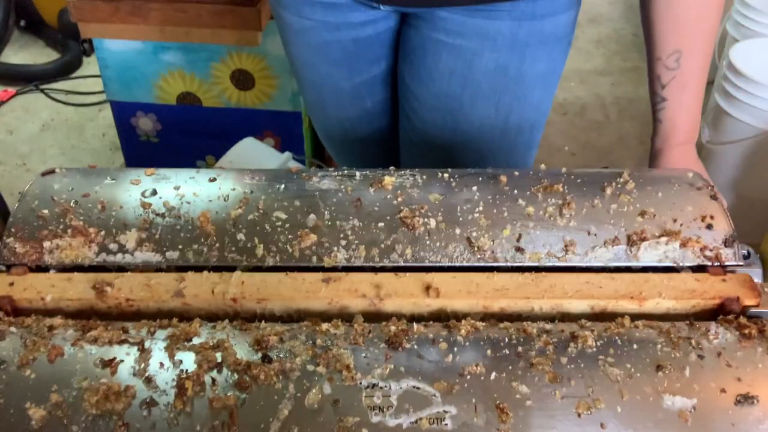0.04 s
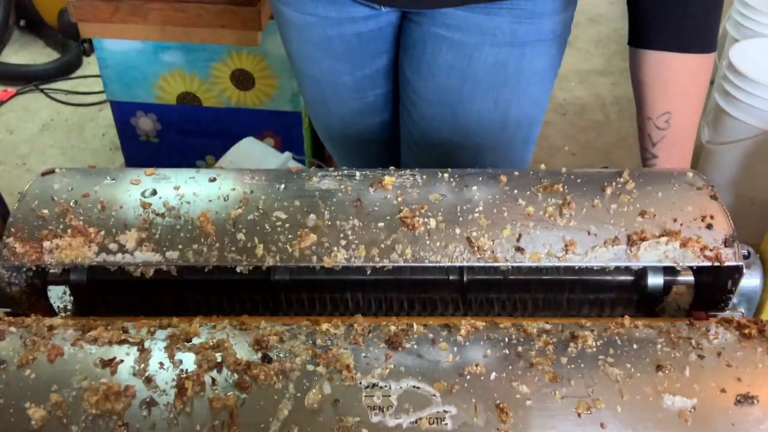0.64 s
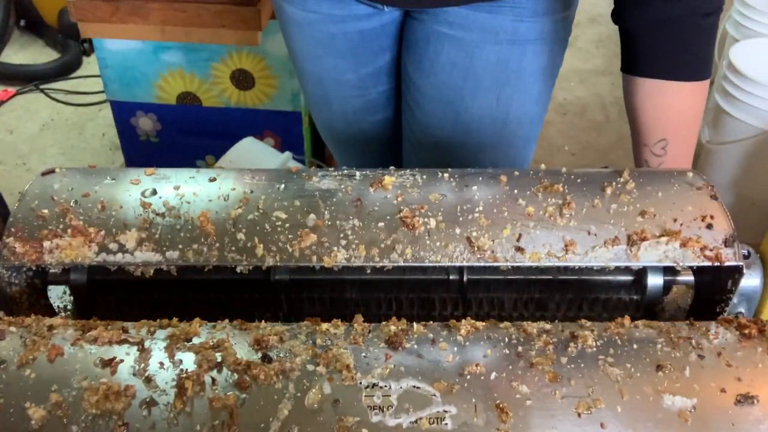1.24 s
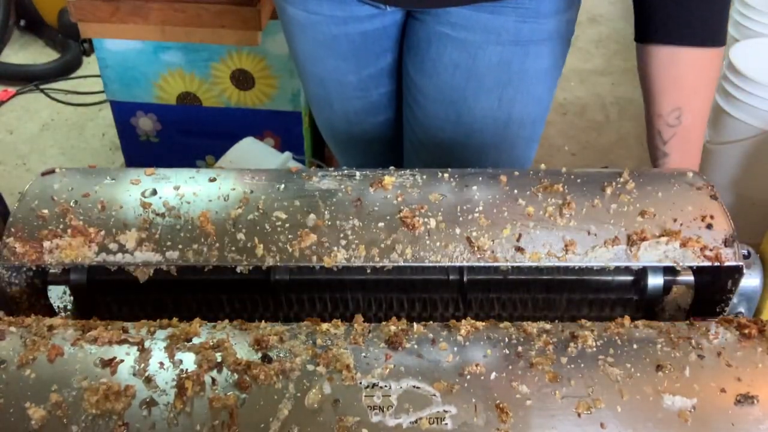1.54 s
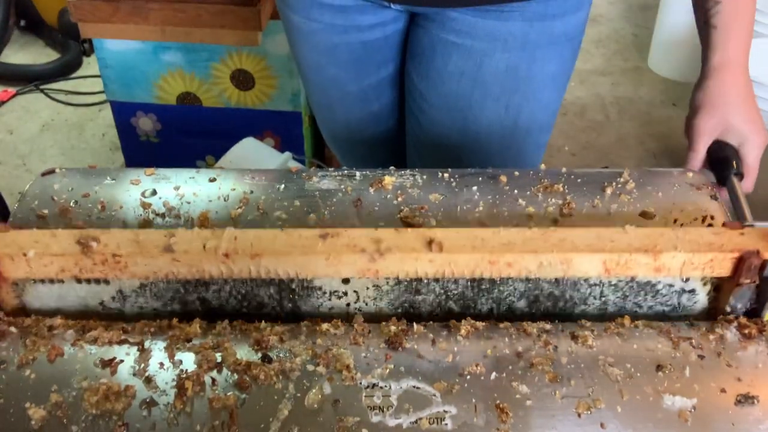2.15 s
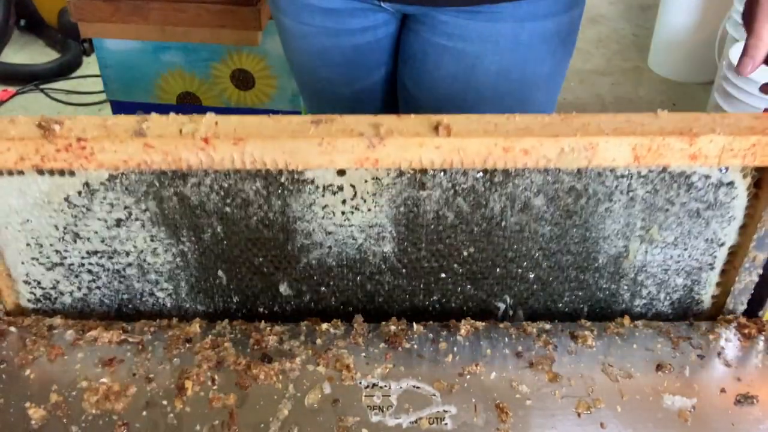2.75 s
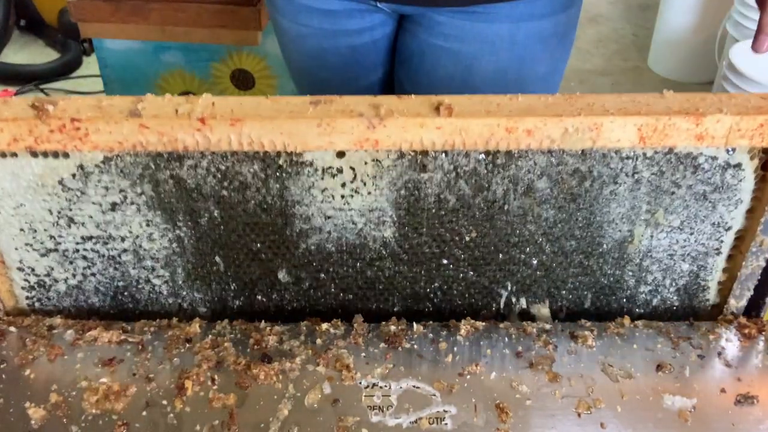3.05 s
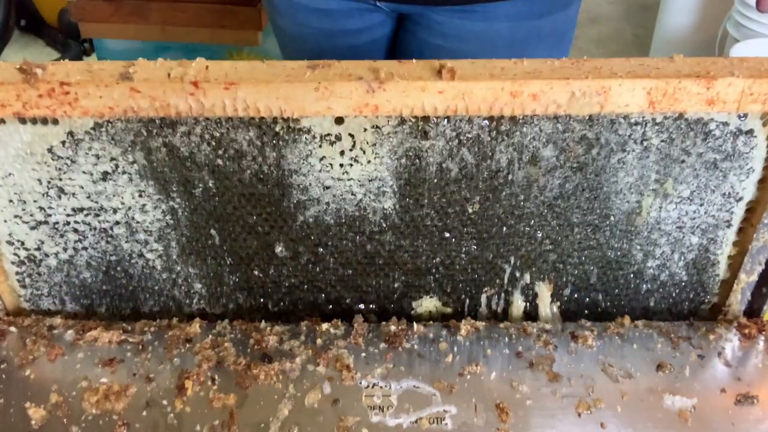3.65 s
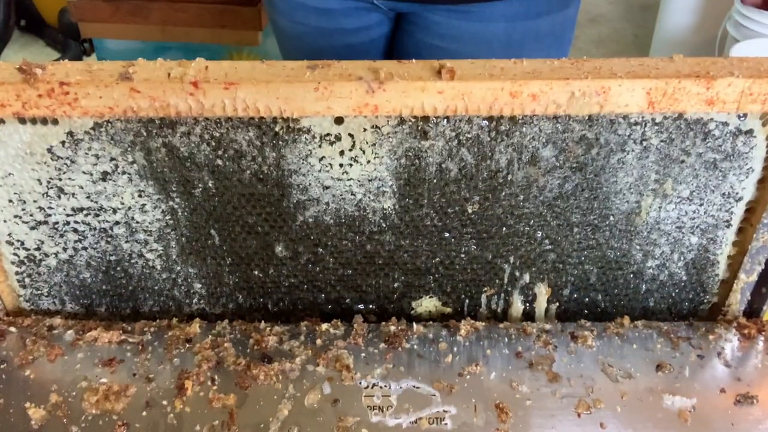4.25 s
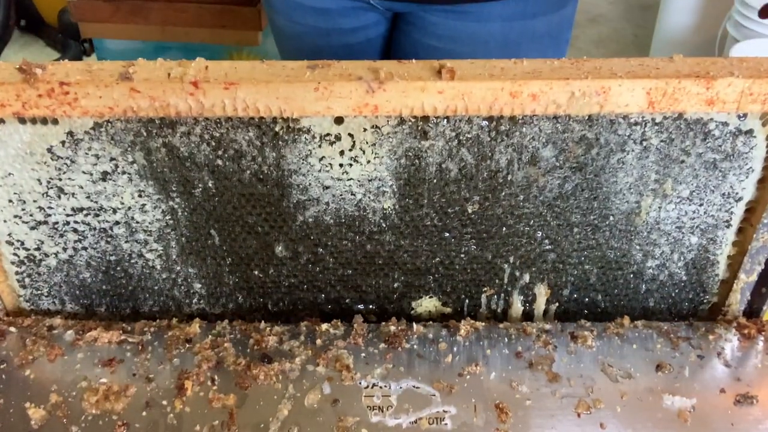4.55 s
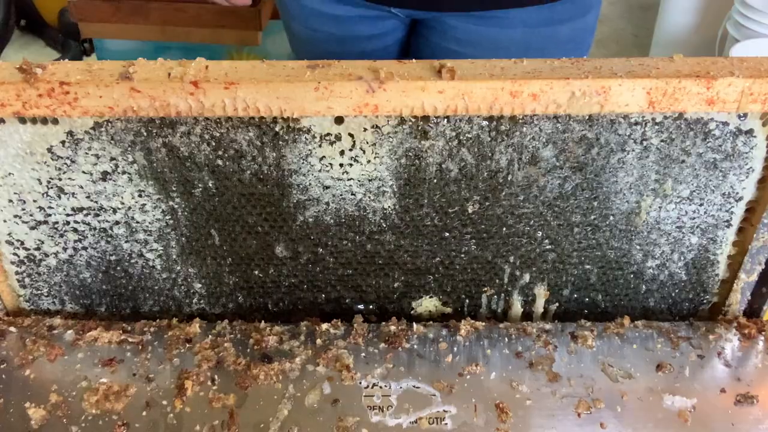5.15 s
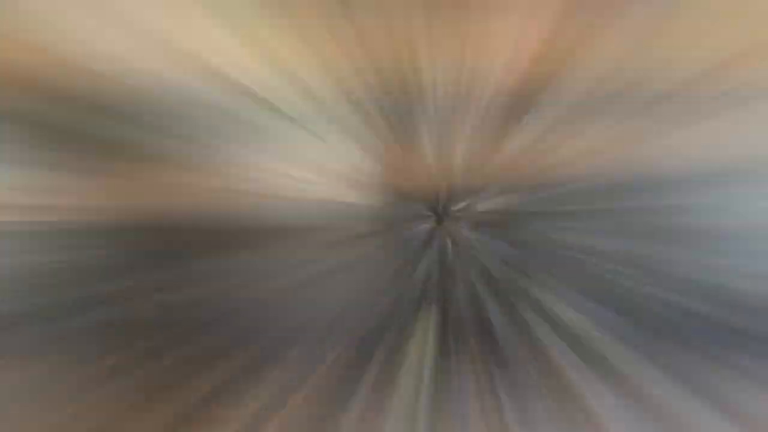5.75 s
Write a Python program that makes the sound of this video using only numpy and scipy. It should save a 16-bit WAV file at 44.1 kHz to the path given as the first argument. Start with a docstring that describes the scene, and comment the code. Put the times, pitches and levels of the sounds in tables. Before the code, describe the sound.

Spinning flails whir and rumble in a steel shell, flicking crumbs of wax, heard from close up indoors. The sound swells into a rough, buzzing grind as they strip a honey frame, then eases. A loud knock comes as the power stops, and a fast run of sharp ticks slows and dies away. Another knock and a soft, sticky crackle of wax leave only the quiet hum of the room.

```python
"""Uncapping a honey frame

Four rows of motor-driven flails whirl in a steel housing, bite into the comb and fling wax.
The motor cuts out, the cradle clacks against its stop and the flails tick ever slower on the frame.
Sticky wax drags and snaps over the hum of the workroom."""
import sys
import numpy as np
from scipy import signal
from scipy.fft import rfft, irfft
from scipy.io import wavfile

SR = 44100
rng = np.random.default_rng(int(sys.argv[2]) if len(sys.argv) > 2 else 0)


def transcribe(signal):
    """Save signal, clipped to [-1, 1], as a 16-bit WAV file at the path in sys.argv[1]."""
    frames = np.atleast_2d(signal).T
    limited = np.clip(frames, -1, 1)
    pcm = np.round(limited * 32767).astype(np.int16)
    wavfile.write(sys.argv[1], SR, pcm)


N = 260631
T = np.arange(N) / SR
POWER_OFF_S, REST_S = 3.35, 4.55


def amp(db):
    """Decibels to gain."""
    return 10 ** (np.asarray(db) / 20)


def pan(left_db, right_db):
    """A gain for each channel."""
    return amp([[left_db], [right_db]])


def curve(rows, column=1):
    """One column of a table, joined by straight lines in time."""
    rows = np.array(rows)
    return np.interp(T, rows[:, 0], rows[:, column])


def since(s):
    """Seconds after s, zero before."""
    return np.maximum(T - s, 0)


def swell(s, half_s):
    """A smooth rise and fall around time s."""
    return np.exp(-((T - s) / half_s) ** 2)


def fade(t60_s, size=SR // 2):
    """Exponential decay."""
    return np.exp(-np.log(1000) * np.arange(size) / SR / t60_s)


def walk(rate_hz):
    """Smooth random wander with a spread near 1."""
    return 1.2 * np.interp(T * rate_hz, np.arange(1024), rng.standard_normal(1024))


def unit(x):
    """Scale so that the mean of the channels has rms 1."""
    return x / np.sqrt(np.mean(np.atleast_2d(x).mean(axis=0) ** 2))


def unit_peak(x):
    """Scale to a peak of 1."""
    return x / np.abs(x).max()


def add(out, s, x):
    """Mix a short stereo sound in at time s."""
    i = max(int(s * SR), 0)
    out[:, i:i + x.shape[1]] += x[:, :max(N - i, 0)]


def butter(x, hz, kind="low", order=2):
    """Butterworth filter."""
    return signal.sosfilt(signal.butter(order, hz, kind, fs=SR, output="sos"), x)


def convolve(x, impulse):
    """Convolve in time, keeping the length of x."""
    return signal.oaconvolve(x, impulse, axes=1)[:, :x.shape[1]]


def colour(x, spectrum, modes=(), size=8192):
    """Minimum-phase filter from a spectrum (Hz, dB) and resonances (Hz, width in Hz, lift in dB)."""
    f = np.arange(size // 2 + 1) * SR / size + 1
    hz, db = np.transpose(spectrum)
    humps_db = sum(lift / (1 + (2 * (f - centre) / width) ** 2) for centre, width, lift in modes)
    gain = amp(np.interp(np.log(f), np.log(hz), db) + humps_db)
    cepstrum = irfft(np.log(gain))[:size // 2]
    cepstrum[0] /= 2
    impulse = irfft(np.exp(rfft(2 * cepstrum, size)))[:size // 2]
    return convolve(x, impulse[None])


def diffuse(size=N, split_hz=560):
    """Noise from all round: alike in both channels in the bass, unrelated above."""
    mid, side = rng.standard_normal((2, size))
    bass = butter(np.roll(side, size // 2), split_hz, order=1)
    side = butter(side, split_hz, "high") + .047 * bass
    return np.array([mid + side, mid - side])


def narrow(hz, width_hz):
    """A noisy resonance whose centre may move."""
    drift = butter(rng.standard_normal(N) + 1j * rng.standard_normal(N), width_hz / 2)
    carrier = np.exp(2j * np.pi * np.cumsum(hz * np.ones(N)) / SR)
    return unit(np.real(drift * carrier))


def crackle(grain_db):
    """Dense tiny grains of unequal size."""
    return unit(rng.standard_normal(N) * amp(grain_db * np.minimum(rng.exponential(size=N), 6)))


def from_right(x, lag_s=.000263):
    """A sound from the right reaches the left channel a little later."""
    delay = np.sinc(np.arange(24) - lag_s * SR) * np.hanning(24)
    return np.array([np.convolve(x, delay)[:len(x)], x])


def engaged():
    """Share of the comb that lies between the flails as the frame is raised."""
    return np.interp(T, [1.4, 1.75, 2.6, 3.4], [0, 1, 1, 0])


def moving(settle_s=.12):
    """1 while the flails swing, 0 once they have settled."""
    return np.clip(1 - since(REST_S) / settle_s, 0, 1)


# Force in dB of each flail row in one turn.
ROW_FORCE_DB = [3.5, 1, 1.5, -0.5]
def strikes(phase, decay, scatter_db, floor):
    """An uneven pulse at each flail row; phase and decay are counted in strikes."""
    count = phase.astype(int)
    row_db = np.array(ROW_FORCE_DB)[count % len(ROW_FORCE_DB)]
    force = amp(row_db + scatter_db * rng.uniform(-1, 1, 512)[count])
    return unit(floor + force * np.exp(-(phase % 1) / decay))


# Each row: frequency in Hz, level in dB.
ROOM_SPECTRUM = [(20, -27.5), (50, -10), (95, -8.5), (165, -7.5), (330, -4), (450, -11.5), (700, -20.5),
                 (1500, -23.5), (2600, -33), (6000, -40.5), (16000, -54)]
ROOM_HUM = [(97.5, -7), (154, -9), (191, -1.5), (288.5, -2.5), (407, -5.5), (554, -20.5)]
def room():
    """The workroom murmurs and hums; both sink after the machine has stopped."""
    hum = sum(amp(db + walk(8)) * narrow(hz, width_hz=8) for hz, db in ROOM_HUM)
    hum = hum * amp(-62.5 - since(REST_S))
    murmur = unit(colour(diffuse(), ROOM_SPECTRUM)) * amp(-63.5)
    lift_db = np.maximum(7 - 6.5 * since(REST_S), 0)
    return (murmur + hum) * amp(lift_db)


# Each row: frequency at full speed in Hz, level in dB.
MOTOR_HUM = [(119.8, -41.5), (269, -41.5), (592, -56.5)]
# Each row: time in seconds, level of the tone in dB, level of its octave in dB.
MOTOR_WHINE = [(0, -51, -70), (.3, -52.5, -59.5), (.6, -59, -61.5), (.95, -53, -57), (1.4, -55.5, -57.5),
               (1.7, -60, -68), (2.4, -64.5, -72), (3.3, -50, -78)]
def motor(speed, whine_hz=1321, flutter_hz=45, stop_s=.082):
    """Mains hum and a whine that flutters in the flails' draught sink and die at the power cut."""
    run_time = np.cumsum(np.where(T < POWER_OFF_S, 1, speed) * (1 + .0013 * walk(16))) / SR

    def tone(hz, db, wobble=0):
        return amp(db) * np.sqrt(2) * np.sin(2 * np.pi * hz * run_time + wobble)

    hum = sum(tone(hz, db + 2.3 * walk(7.9) + 1.5 * walk(35)) for hz, db in MOTOR_HUM)
    whine = 0
    for k in (1, 2):
        whistle = tone(k * whine_hz, db=2.6 * walk(flutter_hz), wobble=.5 * walk(flutter_hz))
        air = amp(-3) * narrow(k * whine_hz, width_hz=70)
        whine += (whistle + air) * amp(curve(MOTOR_WHINE, k))
    return (hum + whine * pan(-6, 1)) * np.exp(-since(POWER_OFF_S) / stop_s)


# Each row: frequency in Hz, level in dB.
WHISK_SPECTRUM = [(500, -12.5), (1400, 5.5), (2300, -5), (3000, -4), (4500, -2.5), (5700, 4), (7000, -0.5),
                  (10000, -24.5)]
def whisk(phase, speed):
    """The flails whisk the air into a hiss that dies quickly with their speed."""
    hiss = unit(colour(diffuse(), WHISK_SPECTRUM))
    return hiss * strikes(phase, decay=.52, scatter_db=1.8, floor=.99) * amp(-53.5) * speed ** 2


# Each row: frequency in Hz, level in dB.
RUMBLE_SPECTRUM = [(20, -44.5), (45, -12.5), (80, -8), (115, 2.5), (170, -6), (290, -8.5), (400, -21),
                   (600, -15), (1200, -44.5), (4000, -67)]
# Each row: frequency in Hz, width in Hz, lift in dB.
HOUSING_MODES = [(92.3, 6.1, -5), (115.6, 7.5, -1.5), (204.5, 33, 8.5), (262.9, 8, 11), (354.7, 70, 10),
                 (373, 85, 2), (594, 110, -1.5), (763, 4.2, 10), (1103, 34, -8), (1260, 140, 12)]
# Each row: time in seconds, level in dB.
SHAKE_LEVEL = [(0, -24.5), (.3, -29), (1.3, -30.5), (1.65, -26), (2.55, -21), (2.95, -26), (3.33, -26)]
def housing(phase, speed, unpowered_db=-9.5):
    """The flails shake the steel shell, less and in more distinct pulses once they coast."""
    shaking = diffuse() * strikes(phase, decay=.4, scatter_db=3, floor=.5 * speed)
    rumble = unit(colour(shaking, RUMBLE_SPECTRUM, HOUSING_MODES))
    unpowered = 1 - np.exp(-since(POWER_OFF_S) / .044)
    level_db = curve(SHAKE_LEVEL) - 1.5 + unpowered_db * unpowered + walk(12)
    return rumble * amp(level_db) * speed ** .56 * moving()


# Each row: frequency in Hz, level in dB.
CRUMB_SPECTRUM = [(500, -14.5), (1000, 3.5), (1700, 5.5), (2400, -4.5), (3600, 1), (4200, 0), (5000, -8.5),
                  (5800, 2), (7000, -4), (10000, -18.5)]
# Resonances of hood and flails. Each row: frequency in Hz, width in Hz, lift in dB.
HOOD_MODES = [(390.4, 21, 13), (525, 33, 7.5), (587, 12, 4.5), (738.8, 21, 11.5), (789, 13, 7),
              (1400, 320, 1.5), (1990, 54, 6.5), (2130, 80, 7), (2480, 150, 4.5), (2844, 84, 6.5),
              (4116, 130, 5)]
def crumbs(phase, scatter_db=4.5, fall_db_per_s=6):
    """Wet crumbs leave with each flail row and patter on the hood, ever fainter."""
    chance = strikes(phase, decay=.35, scatter_db=4, floor=.2) * 260 / SR
    taps = (rng.random((3, N)) < chance) * rng.choice([-1, 1], (3, N))
    taps = taps * amp(scatter_db * np.clip(rng.standard_normal((3, N)), -2, 2))
    patter = convolve(taps[:2] + from_right(taps[2]), diffuse(SR // 2) * fade(.014))
    return unit(colour(patter, CRUMB_SPECTRUM, HOOD_MODES)) * amp(-48.5 - fall_db_per_s * T) * moving()


# Each row: frequency in Hz, level in dB.
WAX_SPECTRUM = [(1500, -17.5), (4000, -6.5), (6500, -0.5), (8500, 5.5), (12000, 5.5), (15500, 5),
                (17000, -27)]
# Each row: time in seconds, level in dB.
MIST_LEVEL = [(0, -46.5), (1.6, -45.5), (1.83, -36), (2.3, -34), (2.46, -41.5), (2.8, -40), (2.92, -48.5),
              (3.3, -49.5)]
WAX_CLUMPS = [(.045, -38), (.095, -39.5), (.205, -36), (.38, -39), (.422, -37), (.492, -35.5),
              (.607, -39.5), (.662, -40.5), (.718, -40), (.825, -34.5), (.885, -37.5), (1.359, -36.5),
              (2.335, -49), (2.395, -32), (2.82, -39)]
def spray(phase, speed, clump_rise_s=.01, clump_t60_s=.24):
    """Strikes fling wax on the steel: a light load as mist, a heavy one in distinct puffs."""
    flung = amp(curve(MIST_LEVEL)) * speed ** 1.5 * moving()
    for s, db in WAX_CLUMPS:
        rise = np.clip(1 + (T - s) / clump_rise_s, 0, 1)
        flung = np.hypot(flung, rise * amp(db - 60 * since(s) / clump_t60_s))
    lumpiness = np.interp(flung, amp([-46, -37]), [.45, 1])
    puffs = 1 + lumpiness * (strikes(phase, decay=.35, scatter_db=5.5, floor=.28) - 1)
    flecks = from_right(crackle(grain_db=.99) * puffs) + .086 * diffuse() * puffs
    return unit(colour(flecks, WAX_SPECTRUM)) * flung


# Each row: frequency in Hz, level in dB.
DRAG_SPECTRUM = [(200, 13), (700, 3), (1500, 3.5), (2500, -1.5), (5000, -2.5), (8000, -2.5), (16000, -0.5)]
# Each row: time in seconds, level in dB.
DRAG_LEVEL = [(4.47, -64), (4.5, -61), (4.53, -56), (4.56, -50), (4.6, -54), (4.625, -44), (4.675, -51.5),
              (4.695, -49), (4.73, -50), (4.77, -67), (4.9, -70), (5.05, -83), (5.5, -100)]
WAX_SNAPS = [(.094, -29), (.194, -25), (.492, -28), (.663, -30), (.719, -25.5), (1.796, -20), (1.853, -20),
             (1.881, -17), (1.909, -21.5), (2.083, -18.5), (2.285, -18), (2.401, -23), (3.115, -26.5),
             (3.225, -32), (3.343, -6.5), (4.109, -27), (4.117, -16.5), (4.48, -39.5), (4.694, -26.5),
             (4.718, -35), (4.728, -35.5), (4.807, -52), (4.856, -51), (4.8728, -44.5), (4.96, -55.5),
             (5.188, -49.5), (5.523, -57), (5.587, -51.5)]
def sticky_wax(size=SR // 4):
    """Honeyed wax drags in the cradle, parts in bright snaps and squeaks once off the steel."""
    smear = unit(colour(from_right(crackle(grain_db=3)) + 1.6 * diffuse(), DRAG_SPECTRUM))
    out = smear * amp(curve(DRAG_LEVEL) + 2 * walk(160))
    # a strand tears for a moment before it parts
    strain = np.clip(np.arange(size) / SR / .005, 0, 1) ** 2
    release = np.roll(fade(.011, size), int(.003 * SR)) + .28 * fade(.13, size)
    for s, db in WAX_SNAPS:
        snap = colour(from_right(rng.standard_normal(size) * strain * release), WAX_SPECTRUM)
        add(out, s - .0018, amp(db + 2.5) * unit_peak(snap))
    squeak = narrow(11200, width_hz=700) * amp(-68) * swell(5.21, half_s=.025)
    return out + squeak


def shudder():
    """The wooden frame booms against the cradle as the comb first meets the flails."""
    return narrow(114.2, width_hz=9.3) * amp(-27.5) * swell(1.69, half_s=.21)


# Each row: time in seconds, lower and upper resonance in Hz, upper over lower in dB, cavity in Hz.
SLOT_TUNING = [(1.5, 964, 1280, -5, 319), (1.9, 980, 1250, 10, 345), (2.2, 1027, 1231, -2, 383),
               (2.4, 1099, 1247, -5.5, 409), (2.75, 1150, 1266, -1, 455.6)]
def slot(phase, load_db):
    """Air between frame and hood sings over a cavity, both retuned as the frame slides through."""
    balance = amp(curve(SLOT_TUNING, 3) / 2)
    lower = narrow(curve(SLOT_TUNING, 1), width_hz=85) / balance
    upper = narrow(curve(SLOT_TUNING, 2), width_hz=85) * balance
    cavity = narrow(curve(SLOT_TUNING, 4), width_hz=55) * amp(-4)
    pulses = strikes(phase, decay=.35, scatter_db=2.5, floor=.45)
    return (lower + upper + cavity) * pulses * engaged() * amp(load_db - 33) * pan(-1.5, .5)


# Each row: time in seconds, centre in Hz, width in Hz, level in dB, half length in seconds.
HOOD_SCRAPES = [(.86, 600, 300, -42, 0.044), (0.98, 1158, 900, -44, 0.026), (1.684, 540, 130, -29, .018),
                (1.62, 1140, 160, -41, 0.11), (1.973, 1250, 120, -29, 0.022), (2.17, 1980, 120, -39, 0.056),
                (2.24, 1235, 150, -28, 0.055), (2.38, 2840, 180, -35, .03), (2.62, 600, 250, -34, 0.044),
                (2.69, 2700, 520, -40, .08), (3.421, 2000, 400, -35, 0.038), (4.49, 2900, 450, -57, 0.013)]
def scrapes(phase):
    """Torn cappings scrape along the hood, pulsed by the flails."""
    rasp = sum(narrow(hz, width) * amp(db) * swell(s, half) for s, hz, width, db, half in HOOD_SCRAPES)
    return rasp * strikes(phase, decay=.35, scatter_db=3, floor=.3) * pan(-1, 1)


# Each row: start in seconds, peak in dB.
CHUNK_RIPS = [(1.9226, -26), (1.937, -21), (2.054, -15.5), (2.167, -16.5), (2.1942, -18), (2.283, -22),
              (2.3698, -18.5), (2.3845, -18), (2.709, -23), (2.74, -23)]
# Each row: frequency in Hz, level in dB.
RIP_SPECTRUM = [(400, -26), (1200, -5), (2100, -1.5), (3000, 0), (4400, 2.5), (6000, -5), (9000, -10),
                (16000, -32)]
def rips(size=SR // 8):
    """A flail rips whole chunks from the comb, each with its own pitch of crunch."""
    out = np.zeros((2, N))
    envelope = fade(.048, size) * (1 - fade(.0053, size))
    for s, db in CHUNK_RIPS:
        crunch = [(rng.uniform(1800, 5000), 700, 6)]
        tear = colour(diffuse(size) * envelope, RIP_SPECTRUM, crunch)
        add(out, s, amp(db) * unit_peak(tear))
    return out


# Each row: frequency in Hz, level in dB, t60 in seconds.
MACHINE_RING = [(196, -11.5, 0.17), (292.4, -7.5, 0.08), (444, -12.5, .05), (495, -1, .11),
                (553, -14, 0.025), (810, -14.5, 0.049), (1136, -2.5, 0.09), (1305, -5, 0.07),
                (1348, 1, 0.063), (1724, -6.5, .1)]
FLAIL_RING = [(2680, -8, 0.17), (2970, -6.5, .1), (3338, -2.5, .12), (3550, -2, 0.12), (3650, -1, .1),
              (3830, -1, 0.079), (3970, -2, .13), (4240, -1.5, 0.14), (4500, -0.5, .11), (4780, -13, .1)]
def ring(modes, low_db=0, size=SR // 2, scatter_db=4, detune=.009):
    """Struck steel rings a little differently at every blow; low_db lifts the low modes."""
    t = np.arange(size) / SR
    out = 0
    for hz, db, t60_s in modes:
        force, shift, side = rng.uniform(-1.02, 1, 3)
        spread = np.array([[1], [-1]]) * side * min(hz / 3000, 1)
        angle = 2 * np.pi * hz * (1 + detune * shift) * t + np.pi * shift + spread
        gain = amp(db + scatter_db * force + low_db * (hz < 650))
        out += gain * np.sin(angle) * fade(t60_s, size)
    return out * pan(-1, 1)


# Each row: start in seconds, crack in dB, thud in dB, t60 in seconds, thud cutoff in Hz.
CRADLE_KNOCKS = [(3.3438, -21, -17, 0.37, 1500), (4.114, -36.5, -27.5, 0.29, 500),
                 (4.483, -59, -58, 0.1, 1510), (5.2, -92, -45.5, 0.25, 351), (5.524, -72.5, -74, .08, 1500),
                 (5.856, -82, -46.5, 0.12, 1500)]
# Each row: frequency in Hz, level in dB.
CRACK_SPECTRUM = [(300, -15.5), (750, 8), (1400, 7), (2200, 5), (3600, 1), (5000, 1), (8000, 2),
                  (16000, -30)]
THUD_SPECTRUM = [(40, -23.5), (90, -1.5), (190, -2.5), (340, -9.5), (600, -5), (1200, -11.5), (2000, -30.5),
                 (6000, -49.5)]
# Each row: frequency in Hz, width in Hz, lift in dB.
CRADLE_MODES = [(500, 70, 8), (790, 90, 8), (1135, 70, 6), (1320, 110, 5), (3000, 130, 8), (4030, 220, 7),
                (5850, 200, 4), (7750, 700, 4), (8800, 400, 4)]
def knocks(size=SR // 2):
    """The cradle strikes the shell: a rattling crack over a dull thud."""
    out = np.zeros((2, N))
    attack = 1 - fade(.003)
    for s, crack_db, thud_db, t60_s, cutoff_hz in CRADLE_KNOCKS:
        crack = unit(colour(diffuse(size), CRACK_SPECTRUM, CRADLE_MODES))
        crack *= 1.1 * fade(t60_s) + 2.1 * fade(.071)
        thud = unit(colour(diffuse(size), THUD_SPECTRUM, HOUSING_MODES)) * fade(t60_s)
        boom = colour(amp(1) * ring(MACHINE_RING), THUD_SPECTRUM)  # soft contact favours low modes
        dull = butter(thud + boom, cutoff_hz)
        add(out, s, (amp(crack_db) * crack + amp(thud_db) * dull) * attack)
    return out


# Each row: multiple of the strike rate, level in dB.
DRONE_ORDERS = [(1, -11.5), (2, 0), (3, -22), (4, -7.5), (5, -7.5), (6, -13.5), (8, -17), (9, -19)]
# Each row: time in seconds, multiple of the strike rate, level in dB, half length in seconds.
CAVITY_HOWLS = [(1.89, 5, -24, 0.13), (2.15, 5, -25.5, 0.07), (2.28, 5, -29, .05), (2.256, 6, -28, 0.057),
                (2.39, 2, -24, .06), (2.517, 6, -32, 0.071)]
def drone(phase, load_db):
    """The comb drones, louder the deeper the bite; single orders howl in the shifting cavity."""
    def tone(order):
        gain = np.sqrt(2) * amp(2 * walk(14))
        return gain * np.sin(2 * np.pi * order * phase + .35 * walk(18) + .12 * walk(70))

    orders = sum(amp(db) * tone(k) for k, db in DRONE_ORDERS) * amp(-24.5 + 1.5 * load_db)
    howls = sum(tone(k) * amp(db) * swell(s, half) for s, k, db, half in CAVITY_HOWLS)
    roughness = amp(1.9 * walk(70))
    return (engaged() * orders + howls) * roughness


# How hard the flails work in the comb. Each row: time in seconds, level in dB.
BITE_LEVEL = [(0, -32), (.1, -38.5), (.75, -45.5), (.91, -43), (.97, -42), (1.05, -47.5), (1.4, -45.5),
              (1.52, -37.5), (1.8, -33.5), (2.2, -29), (2.4, -27.5), (2.5, -36.5), (2.58, -31),
              (2.72, -29.5), (2.88, -40.5), (3.3, -36)]
# Each row: frequency in Hz, level in dB.
RASP_SPECTRUM = [(150, -26.5), (400, 5.5), (700, -0.5), (1200, 1), (1600, -7.5), (2400, -13), (4500, -19.5),
                 (6500, -11.5), (9000, -49)]
CELL_SPECTRUM = [(500, -16), (1800, 6), (3000, 0), (4500, 1.5), (6500, -11.5), (10000, -29.5)]
def comb(phase, speed):
    """Each flail row tears at the cappings; the shell rings and bursting cells coarsen the rasp."""
    tearing = unit(diffuse() * strikes(phase, decay=.35, scatter_db=4, floor=.3))
    shell = unit(convolve(tearing[:1], diffuse(SR // 2) * fade(.11)))
    rasp = unit(colour(tearing + 2.5 * shell, RASP_SPECTRUM, HOOD_MODES))
    bursts = np.array([crackle(grain_db=1.5), crackle(grain_db=1.5)])
    bursts *= strikes(phase, decay=.35, scatter_db=2.5, floor=.45)
    cells = unit(colour(bursts, CELL_SPECTRUM, HOOD_MODES)) * amp(-7 + 1.1 * walk(40))
    grind = (rasp + engaged() * cells) * amp(curve(BITE_LEVEL)) * pan(-1, .9)
    return grind * speed ** 1.3 * moving()


# Each row: start in seconds, snap in dB, splash relative to it in dB, clack in dB, low-mode lift in dB.
HARD_CATCHES = [(3.1, -21, -11, -28, -8), (3.227, -14.5, -9, -20, 7.5), (3.2689, -15, -25.5, -17, 4.5),
                (3.2833, -6, -25, -15, 6.5), (3.326, -4, -11, -13.5, 3), (3.3811, -1.5, -20, -19.5, 7),
                (3.396, -6.5, -17, -21.5, 3), (3.4108, -3.5, -16, -18.5, 8.5),
                (3.4265, -7, -25.5, -21.5, -3), (3.4419, -7, -15.5, -21, 5),
                (3.491, -16.5, -21.5, -25, 6.5), (3.5076, -4.5, -13.5, -15, 0.5),
                (3.5246, -9, -12, -19.5, -6), (3.5771, -4, -31, -31, 4.5), (3.5958, -14.5, -20, -22.5, 9),
                (3.6148, -12, -32, -27, -5), (3.635, -11, -17.5, -22, 0.5), (3.6548, -14.5, -25.5, -30, -7),
                (3.696, -2.5, -28.5, -18.5, -9), (3.7176, -9.5, -14, -14.5, -0.5),
                (3.7415, -17.5, -19.5, -26, -3.5), (3.7633, -15, -14, -30.5, 2),
                (3.7862, -4, -19.5, -16.5, -5.5), (3.8114, -8.5, -19, -20, 1),
                (3.8618, -9.5, -17, -21.5, 6.5), (3.89, -8.5, -18, -16.5, -3.5),
                (3.9492, -22, -25, -20, -0.5), (3.979, -9, -12, -19.5, 5.5),
                (4.013, -19.5, -15, -23.5, -16), (4.05, -28, -26, -28, -1), (4.0862, -11, -35, -21.5, 0),
                (4.1733, -13.5, -25, -24, -4), (4.225, -28, -6, -30, 4.5), (4.2824, -19, -19, -23, 2),
                (4.357, -33, -16, -28.5, 7)]
def grazes(phase, graze_db=-16, scatter_db=3):
    """Flails passing between hard catches only graze the frame; returns rows like HARD_CATCHES."""
    catch_s, catch_db = np.transpose(HARD_CATCHES)[:2]
    caught = np.interp(catch_s, T, phase)
    gaps = [np.linspace(a, b, max(round(b - a), 1) + 1)[1:-1] for a, b in zip(caught, caught[1:])]
    passes = np.concatenate(gaps)
    levels_db = np.interp(passes, caught, catch_db) + graze_db
    levels_db += scatter_db * rng.uniform(-2, 1, len(passes))
    return [(s, db, -18, db - 5.5, .5) for s, db in zip(np.interp(passes, phase, T), levels_db)]


# Each row: frequency in Hz, level in dB.
TIP_SPECTRUM = [(600, -36.5), (1900, -9), (2600, -8.5), (3600, -6), (4400, -7), (5000, -13), (8000, -22),
                (16000, -46.5)]
WOOD_SPECTRUM = [(200, -7), (500, -2), (750, -8), (1250, 5), (1900, -9), (3000, -17), (9000, -47.5)]
def ticks(phase, size=SR // 7):
    """A flail tip snaps on the frame, rebounds and rings; wax splashes, wood clacks, the shell booms."""
    out = np.zeros((2, N))
    echo = .011 * diffuse(size) * fade(.31, size)
    wood_noise = colour(diffuse(split_hz=500), WOOD_SPECTRUM)
    wax_noise = colour(from_right(rng.standard_normal(N)), WAX_SPECTRUM)
    splash_fade = fade(.02, size) + .082 * fade(.14, size)
    for s, db, splash_db, clack_db, low_db in HARD_CATCHES + grazes(phase):
        rebound = rng.uniform(.2, .75) * rng.choice([-1, 1])
        rebound_s = rng.uniform(.0005, .0016)
        blow = np.zeros(size)
        blow[0], blow[int(SR * rebound_s)] = 1, rebound
        tip_mode = [(rng.uniform(3200, 4400), 700, 5)]
        tip = amp(1.5) * unit_peak(colour(from_right(blow) + echo, TIP_SPECTRUM, tip_mode))
        now = slice(int(s * SR), int(s * SR) + size)
        splash = amp(splash_db - 1) * unit_peak(wax_noise[:, now] * splash_fade)
        wood = .8 * unit_peak(wood_noise[:, now] * fade(.047, size))
        shell = amp(-11) * ring(MACHINE_RING, low_db, size)
        flail = amp(-29.5) * ring(FLAIL_RING, size=size)
        add(out, s + .00088, amp(db) * (tip + splash + flail) + amp(clack_db) * (wood + shell))
    return out * pan(-.6, .6)


def rotor(load_db, strike_hz=71.09, sag_hz=2, drag_s=1.59, friction_hz_per_s=29):
    """Strike count and relative speed: the rotor sags under load; unpowered, drag and friction stop it."""
    driven_hz = strike_hz - sag_hz * amp(load_db) * engaged()
    brake_hz = friction_hz_per_s * drag_s
    hz = (driven_hz + brake_hz) * np.exp(-since(POWER_OFF_S) / drag_s) - brake_hz
    speed = np.maximum(hz / strike_hz, 1e-3)
    return np.cumsum(strike_hz * speed) / SR, speed


def scene(full_bite_db=-28):
    """The bite of the flails and the rotor's speed drive rumble, cutting and spray."""
    load_db = curve(BITE_LEVEL) - full_bite_db
    phase, speed = rotor(load_db)
    machine = motor(speed) + housing(phase, speed)
    cutting = comb(phase, speed) + drone(phase, load_db)
    air = slot(phase, load_db) + whisk(phase, speed)
    wax = spray(phase, speed) + sticky_wax() + rips() + scrapes(phase) + crumbs(phase)
    impacts = knocks() + ticks(phase) + shudder()
    return room() + machine + cutting + air + wax + impacts


def record(dry, ceiling=.85, cutoff_hz=16200):
    """Round the highest peaks and cut the top of the treble."""
    rounded = ceiling * np.tanh(dry / ceiling)
    return signal.sosfilt(signal.ellip(8, .2, 70, cutoff_hz, fs=SR, output="sos"), rounded)


dry = scene()
out = record(dry)
transcribe(out)
```